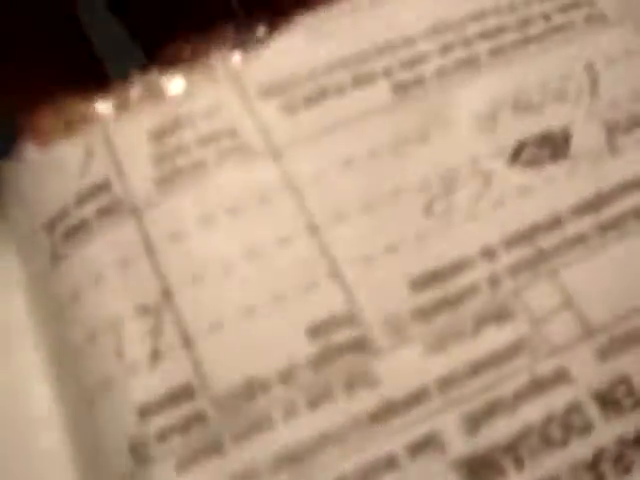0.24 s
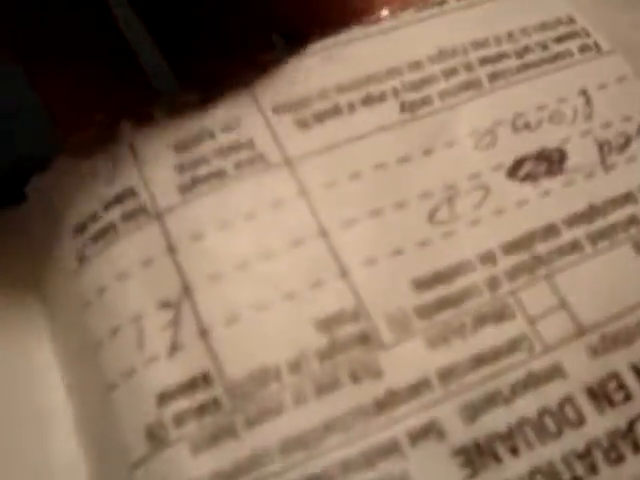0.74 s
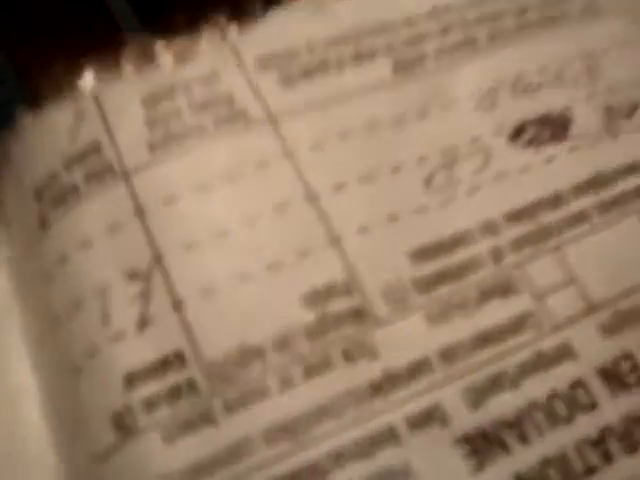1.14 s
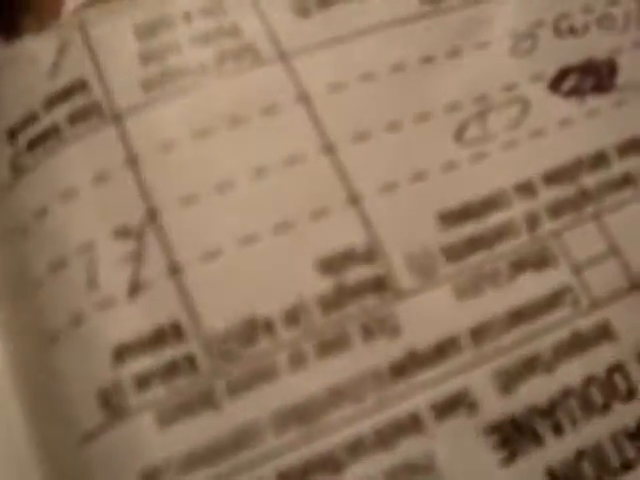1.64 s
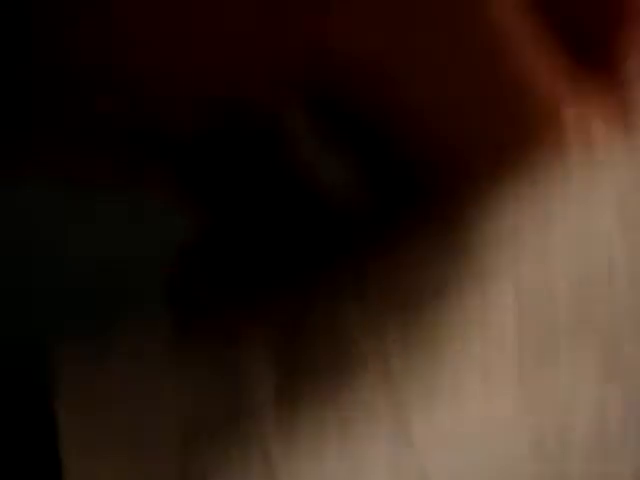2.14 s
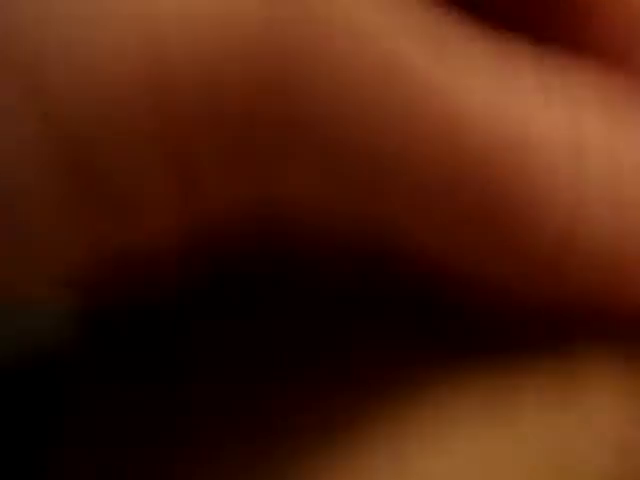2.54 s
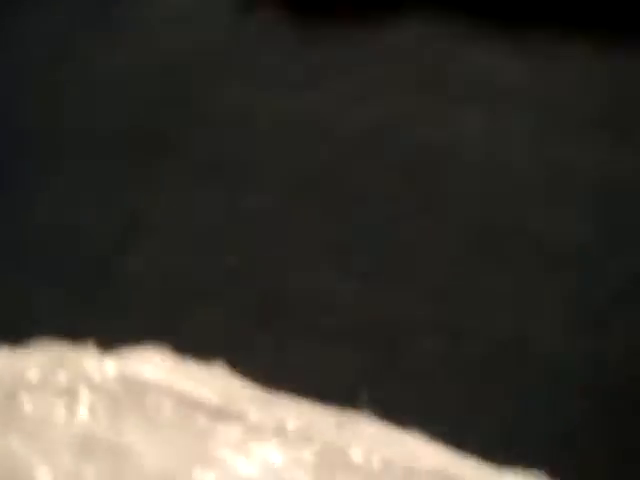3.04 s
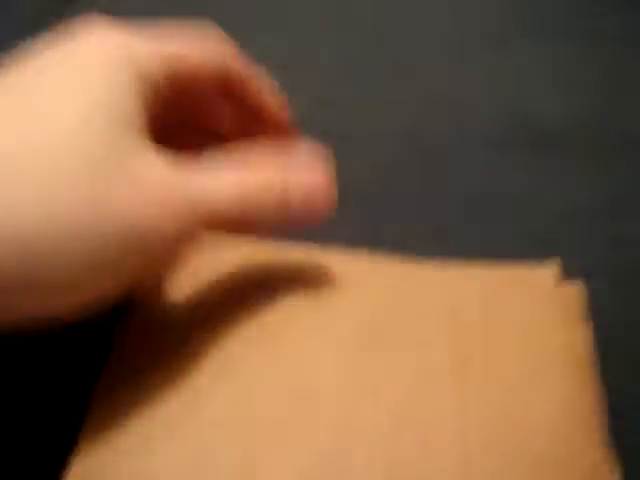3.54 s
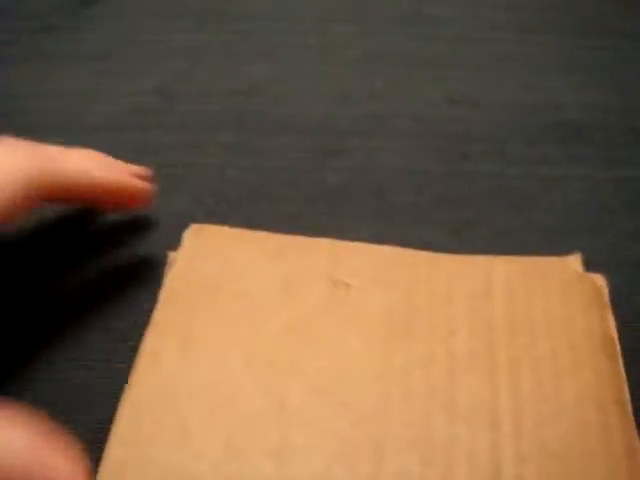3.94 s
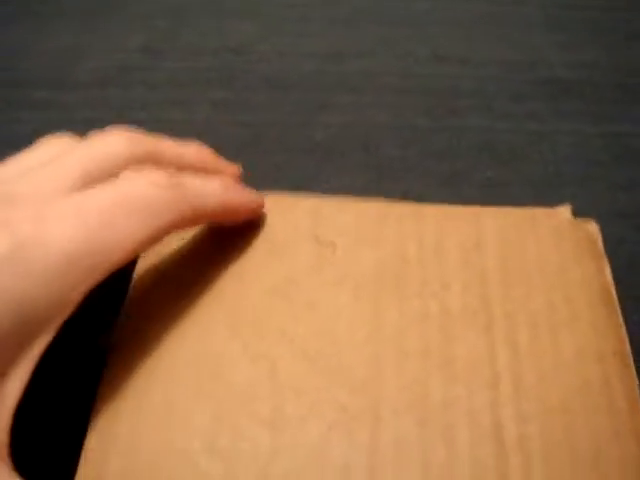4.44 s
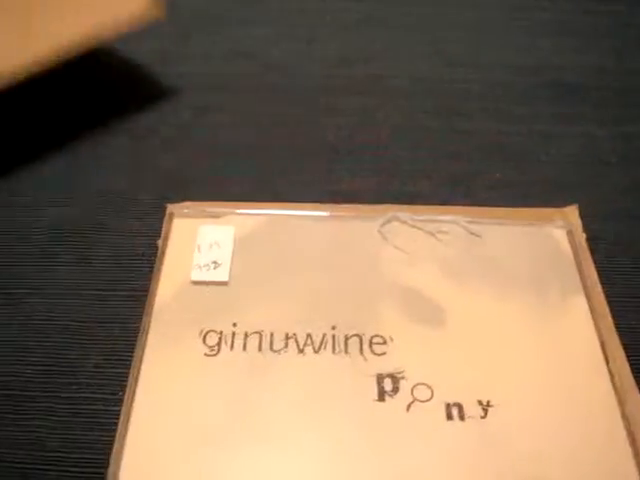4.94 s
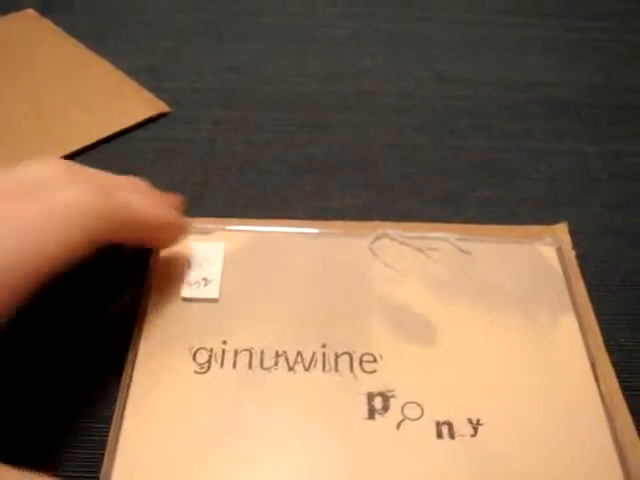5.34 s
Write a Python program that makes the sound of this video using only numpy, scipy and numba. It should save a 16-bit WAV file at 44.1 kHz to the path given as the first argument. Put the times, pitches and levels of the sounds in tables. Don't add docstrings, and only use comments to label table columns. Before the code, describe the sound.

A quiet indoor room with low steady air hum and slight hiss, heard through a small close camera microphone with limited treble. From the start, stiff envelope paper creaks softly and ticks, with scattered pops. Around 0.4 to 0.5 s a loud creak and a tight burst of snaps crack out. Lighter crackles and hollow pops continue, with a firmer pair near 1.0 and 1.24 s. Very loud, clipped snaps hit at 1.45 and 1.49 s, followed by rustle. A softer spell of small crackles leads to hard pulls and sharp cracks from 2.0 to 2.3 s. From 2.4 to 3.0 s dense bright crinkling swells, strongest around 2.8 to 3.0 s, as the card sleeve comes out. Small knocks follow at 3.2 and 3.4 s, and a cluster of snaps at 3.6 s. After that it is nearly silent: faint brushing and a tiny squeak around 4.5 s, a small tick at 4.65 s, barely audible touches near 5.15 and 5.4 s, ending about 5.5 s.

```python
import sys
import numpy as np
from scipy import signal
from scipy.fft import rfft, irfft
from scipy.io import wavfile
from scipy.ndimage import uniform_filter1d, minimum_filter1d
from numba import njit

SR = 44100
rng = np.random.default_rng(int(sys.argv[2]) if len(sys.argv) > 2 else 0)


def to_wav(s):
    ch = np.atleast_2d(s).T
    pcm = np.round(np.clip(ch, -1, 1) * 32767)
    wavfile.write(sys.argv[1], SR, pcm.astype(np.int16))


def boost_factor(decibels):
    exponent = np.asarray(decibels, float) / 20
    return 10 ** exponent


N = 245625

# start in seconds, peak in dB, patch pitch in Hz, fall in ms.
SNAPS = [(0.1553, -20.5, 3200, 2), (.2958, -20.5, 645, 3.1), (0.492, -19, 740, 4.9),
         (.5041, -4.5, 530, 2.37), (0.5078, -8, 450, 5.4), (0.8185, -28, 676, 1.43),
         (0.982, -17, 1130, 7.6), (0.993, -16.5, 1560, 4.1), (1.1602, -21.5, 744, 0.76),
         (1.168, -19.5, 4100, 1.3), (1.2362, -8, 970, 1.3), (1.382, -19, 3860, 1.6), (1.4519, 2, 1560, 1.3),
         (1.4904, 4.5, 1560, .8), (1.722, -32, 3920, 1.5), (1.7976, -32, 820, 5.3),
         (2.0052, -11.5, 1450, 1.7), (2.0297, 1.5, 1870, 2.8), (2.0836, -18, 1510, 3.8),
         (2.2192, -22, 885, 4.7), (2.3116, -5, 2200, 0.88), (3.1873, -19.5, 2860, 1.06),
         (3.2089, -23.5, 268, 3.2), (3.366, -36, 850, 5.1), (4.646, -30.5, 1100, 2.6),
         (3.5867, -10, 1186, 6.1), (3.5903, -8, 2840, 2.2), (3.5925, -6.5, 1164, 3.76),
         (3.61, -18, 1180, 2.8), (4.645, -32, 3140, 4.2)]
# start in seconds, peak in dB, patch pitch in Hz, fall in ms.
CRACKS = [(.1956, -24.5, 2830, 0.43), (.2260, -35, 670, 2), (.2448, -27.5, 1090, 0.78),
          (.3754, -40, 1630, 2.7), (.5071, -6.5, 2650, 5.5), (.5135, -12, 3920, 3.3),
          (1.272, -31, 5000, 1.1), (1.4125, -35, 1820, 7.1), (1.4985, -21, 740, 3.2),
          (1.7395, -30, 790, 1.64), (1.7679, -33, 670, 2.6), (1.8105, -27.5, 3040, 1.3),
          (1.836, -31.5, 1570, 0.64), (1.8755, -25, 970, 1.56), (1.9007, -26, 830, 4.8),
          (1.9845, -22, 260, 1.66), (1.9908, -26, 885, 3.3), (2.049, -15.5, 970, 5.3),
          (2.1645, -8, 2150, 3.65), (2.2645, -24, 650, 0.57), (2.554, -30, 800, 3.8),
          (3.1228, -33, 1405, 1.34), (3.5228, -29, 3570, 3.7), (5.1469, -48, 320, 3.7),
          (5.162, -48, 1244, 10.5)]
# start in seconds, peak in dB, patch pitch in Hz, fall in ms.
POPS = [(.138, -16, 755, 2.7), (0.2935, -16.5, 1424, 3.4), (0.562, -24, 676, 8.5), (.6946, -20.5, 690, 3.7),
        (0.752, -39, 1250, 1.1), (0.7803, -27.5, 2400, 1.3), (0.8826, -20, 410, 2.1),
        (0.932, -20.5, 690, 4.9), (.9855, -9, 1923, 6.2), (0.988, -12, 590, 3.9), (1.0576, -27, 710, 6.6),
        (1.0887, -22.5, 655, 5.6), (1.115, -11, 1125, 1.1), (1.2356, -8.5, 1640, 2.3),
        (1.3458, -21.5, 4170, 2.3), (1.5445, -11.5, 397, 1.7), (1.652, -22, 1020, 2),
        (2.2821, -13.5, 2710, 1.5), (2.2803, -1.5, 1930, .9), (2.7396, -22, 880, 1.1),
        (2.8616, -16, 1040, 5.4), (2.9865, -12, 2340, 0.88), (3.473, -21, 1530, 4.9),
        (3.548, -24.5, 1470, 4.3), (3.5723, -17, 1220, 1.7), (0.413, -12, 1130, 4.3),
        (0.4134, -15, 1950, 4.5), (3.3858, -9.5, 940, 1.3), (3.387, -18, 410, 1.8)]
# start in seconds, peak in dB, pitch in Hz, fall in ms.
CREAKS = [
    (.084, -19, 780, 7),
    (.104, -23.5, 710, 6.7),
    (0.409, -5, 670, 4.2),
    (0.5108, -4, 730, 4.2),
    (4.506, -42.5, 2680, 34),
]
# start in seconds, peak in dB, pitch in Hz, fall in ms.
THUMPS = [(.508, -18.5, 300, 8.4), (1.371, -30.5, 240, 8.7), (2.034, -26, 136, 2.7), (2, -29.5, 67, 4.2),
          (2.311, -22.5, 32, 7), (2.968, -17, 306, 11.8), (3.213, -41, 81, 25), (3.62, -37.5, 90, 32),
          (3.245, -30, 150, 15), (3.369, -36, 130, 19.2), (0.86, -34, 63, 6), (.52, -22, 62, 11)]
# start in seconds, peak in dB, pitch in Hz.
TICKS = [(.0092, -23, 5540), (0.0296, -26.5, 6970), (.036, -26, 3350), (0.1185, -25, 1410),
         (0.1765, -37, 3820), (0.3699, -23.5, 7430), (0.4438, -23.5, 7160), (.455, -32, 6400),
         (.645, -26.5, 7730), (.68, -28.5, 6200), (0.7374, -29.5, 2500), (0.8936, -25.5, 5600),
         (.9034, -31, 3120), (1.247, -19, 5500), (1.1282, -19.5, 1770), (1.1805, -18, 6880),
         (1.2271, -22, 6070), (1.31, -25, 6500), (1.3192, -28.5, 6450), (1.353, -21, 6700),
         (1.8826, -31, 1350), (1.9222, -19, 3370), (1.9371, -20, 2800), (1.9639, -35, 1420),
         (2.394, -16.5, 3030), (2.404, -23.5, 3120), (2.5213, -32, 2240), (2.9666, -17, 1990),
         (3.165, -28, 6000), (3.27, -29, 7700)]
TICK_FALL_MS = 1
# spray against ring in dB, least rise in ms, rise as share of fall,
# neighbour modes in dB.
BUCKLE_KINDS = [
    (2.5, .7, .22, -0.3),
    (-5.5, .55, 0.13, 3.5),
    (-15, .55, 0.13, 0.4),
    (-23, 0.36, 0.88, -5),
    (-47, 4.2, 0.18, -1),
    (-2.5, 0.83, 0.075, 5.5),
]

# time in seconds, effort in dB, small creases against body in dB.
GRIP = [(0, -54, 17.5), (.2, -52.5, 8.5), (.26, -51, -2.5), (.55, -44, 1), (.7, -47, -8), (.81, -52, 0.5),
        (1.1, -45.5, -5.5), (1.8, -52, -1.5), (2.0, -55, -3), (2.4, -39, 9), (2.55, -45, 4), (3.1, -51, 11),
        (3.3, -53, -10.5), (3.5, -48.5, -6), (3.72, -58.5, -4.5), (4.3, -57, 1.5), (4.75, -55, -5.5),
        (5.56, -60, -1)]
# full effort at seconds, hold in seconds, effort in dB,
# small creases against body in dB.
STROKES = [(0.076, 0.056, -36, -17), (0.443, 0.081, -46.5, 6.5), (0.584, .02, -52.5, 12),
           (1.029, 0.007, -42.5, -2), (1.19, .01, -45, 2), (1.355, 0.014, -53, 7), (1.42, .03, -45.5, 3),
           (1.488, 0.012, -29.5, -4.5), (1.553, .13, -39, -2), (2.015, 0.016, -31.5, 3.7),
           (2.133, 0.14, -36.5, 7.7), (2.251, 0.051, -29.5, 0.5), (0.724, 0.014, -54, -6),
           (0.875, 0.023, -44.5, -11), (1.228, 0.0079, -48, -3.2), (1.622, 0.033, -59, -2)]
# full effort at seconds, hold in seconds, effort in dB,
# small creases against body in dB.
SLIDES = [(2.918, 0.039, -43.5, 17), (3.123, .04, -46, 2.5), (3.384, .01, -44, 4.5), (3.538, .01, -51, 3),
          (2.402, 0.025, -33.5, -2), (2.561, 0.011, -41.5, 8), (2.67, 0.033, -32, 6.5),
          (2.735, 0.062, -33, 8.5), (2.816, 0.044, -27, 1.5), (2.968, 0.0049, -17.5, -5.5),
          (3.417, 0.035, -51.5, 11), (3.48, .02, -41, -5), (3.6, 0.022, -42, 1.5), (4.448, .004, -52, 4.5),
          (4.522, 0.15, -56, 1.5), (5.156, 0.0036, -60.5, 17), (5.433, 0.045, -60.5, 8)]
# full effort at seconds, hold in seconds, effort in dB,
# small creases against body in dB.
JERKS = [
    (1.677, 0.023, -47, 8.5),
    (1.909, 0.038, -36.5, 4.5),
    (2.081, 0.014, -31.5, 2.5),
    (2.994, 0.039, -34, 10.5),
    (3.194, 0.026, -40.5, 2),
]
ATTACK_DB_PER_S, RELEASE_DB_PER_S, STOP_DB_PER_S = 288.5, 234, 1200
CREASE_HASTE = 1.28
PANEL_DB, PANEL_FOLLOW, PANEL_DULL = -52.5, 0.46, 0.067
CARD_OUT_S, ENVELOPE_SCATTER_DB, CARD_SCATTER_DB = 2.4, 2, -0.48
SMOOTH_PER_DB = .09

# centre in Hz, width in Hz.
BANDS = [
    (350, 650),
    (1650, 2100),
    (6000, 6500),
]
# frequency in Hz, level in dB per Hz.
PAPER = [(71, -55), (120, -37.5), (387, -12), (492, -12.5), (843, -3), (2020, -4.5), (2520, -2), (6500, 1),
         (8590, 0.5), (10200, -3), (13200, -50), (22000, -120)]
# frequency in Hz, level in dB per Hz.
ROOM = [(15, -49), (25, -22.5), (173, -11), (246, -4), (387, -3), (417, -44), (473, 0.5), (550, -12.5),
        (843, -13), (980, -14.5), (1700, -13.5), (2960, -21.5), (10200, -15), (13200, -70), (22000, -120)]
ROOM_DB = -51.5
TOP_HZ = 10050


@njit
def grains(start, hz, rise_s, t60_s, size, turn):
    out = np.zeros(N)
    for k in range(len(start)):
        spin = np.exp(2j * np.pi * hz[k] / SR)
        fade = np.exp(-np.log(1000) / (t60_s[k] * SR))
        z = size[k] * np.exp(1j * turn[k])
        up = 1 + int(rise_s[k] * SR)
        for i in range(min(N - start[k], up + int(.5 * t60_s[k] * SR))):
            out[start[k] + i] += z.imag * min(1., (i + 1) / up)
            z *= spin if i < up else spin * fade
    return out


def shape_db(table, hz):
    table_hz, db = np.transpose(table)
    return np.interp(np.log(hz), np.log(table_hz), db)


def sample(s):
    return np.clip(s * SR, 0, N - 1).astype(np.int64)


def walk(rate_hz):
    held = rng.standard_normal(N // 100)[(np.arange(N) * rate_hz / SR).astype(int)]
    return uniform_filter1d(held, int(SR / rate_hz))


def buckles():
    ticks = [tick + (TICK_FALL_MS,) for tick in TICKS]
    rows = []
    for table, kind in zip((CRACKS, SNAPS, POPS, CREAKS, THUMPS, ticks), BUCKLE_KINDS):
        spray_db, least_rise_ms, rise_share, modes_db = kind
        for row in table:
            rows.append(row + (spray_db, least_rise_ms + rise_share * row[-1], modes_db))
    return np.transpose(rows)


def snaps(count=40, lo_hz=350, hi_hz=10000, crack_cycles=4.4, spray_db=-3.0, tilt=0.49,
          order=6, ring=5.0, ring_db=-6.5, near_db=-10.5, near_octaves=.8):
    s, db, patch_hz, fall_ms, crack_db, rise_ms, modes_db = buckles()[:, :, None]
    fall_s, rise_s = fall_ms / 1000, rise_ms / 1000
    late, early, pitch, turn, big = np.moveaxis(rng.random((len(s), count, 5)), 2, 0)
    hz = lo_hz * (hi_hz / lo_hz) ** pitch
    delay_s = rise_s * np.sqrt(early) - 0.66 * fall_s * np.log(late) * (1500 / hz) ** .3
    piled = count * 0.7 / hz / (0.56 / hz + fall_s + rise_s)
    size = boost_factor(db + crack_db + spray_db + shape_db(PAPER, hz) + 3.4 * big)
    size = size * (hz / 1500) ** tilt / np.sqrt(1 + piled)
    flat_hz = hz.ravel()
    cracks = grains(sample(s + delay_s).ravel(), flat_hz, 0.37 / flat_hz, crack_cycles / flat_hz,
                    size.ravel(), 2 * np.pi * turn.ravel())
    other = np.arange(order) > 0
    mode_hz = patch_hz * 2 ** (other * near_octaves * (2.4 * pitch[:, :order] - 1))
    mode_hz = np.minimum(mode_hz, hi_hz)
    start_s = s + other * .5 * fall_s * late[:, :order]
    strength = boost_factor(db + ring_db + other * (near_db + modes_db + 1.3 * big[:, :order]))
    phase = turn[:, :order] * (1 + 5 * other)
    each = np.ones(order)
    patch = grains(sample(start_s).ravel(), mode_hz.ravel(), (rise_s * each).ravel(),
                   ((ring * fall_s + 0.0015) * each).ravel(), strength.ravel(), phase.ravel())
    return cracks + patch


def effort(t):
    s, grip_db, bright_db = np.transpose(GRIP)
    full_s, hold_s, stroke_db, shine_db = np.transpose(STROKES + SLIDES + JERKS)[:, :, None]
    counts = [len(STROKES + SLIDES), len(JERKS)]
    release = np.repeat([RELEASE_DB_PER_S, STOP_DB_PER_S], counts)[:, None]
    short_db = ATTACK_DB_PER_S * np.maximum(full_s - t, 0)
    short_db = short_db + release * np.maximum(t - full_s - hold_s, 0)

    def total_db(base_db, peaks_db):
        return 10 * np.log10(boost_factor(2 * base_db) + boost_factor(2 * peaks_db).sum(axis=0))

    body_db = total_db(np.interp(t, s, grip_db), stroke_db - short_db)
    creases_db = total_db(np.interp(t, s, grip_db + bright_db),
                          stroke_db + shine_db - CREASE_HASTE * short_db)
    panels_db = PANEL_DB + PANEL_FOLLOW * (body_db + 45) - PANEL_DULL * (creases_db - body_db)
    return panels_db, body_db, creases_db


def rustle(count=30000, lo_hz=160, hi_hz=10350, cycles=17.6, surge_db=1.73, surge_hz=60):
    when, pitch, chance, turn = rng.random((count, 4)).T
    at = sample(when * N / SR)
    hz = lo_hz * (hi_hz / lo_hz) ** pitch ** .7
    levels_db = effort(at / SR)
    density_db = [db - 10 * np.log10(width) for db, (_, width) in zip(levels_db, BANDS)]
    knots = np.log([centre for centre, _ in BANDS])
    share = [np.interp(np.log(hz), knots, row) for row in np.eye(3)]
    detail_db = shape_db(PAPER, hz) - np.interp(np.log(hz), knots, shape_db(PAPER, np.exp(knots)))
    per_hz_db = sum(a * b for a, b in zip(share, density_db)) + detail_db
    scatter_db = np.where(at / SR < CARD_OUT_S, ENVELOPE_SCATTER_DB, CARD_SCATTER_DB)
    scatter_db = np.clip(scatter_db - SMOOTH_PER_DB * (levels_db[1] + 55), 0, 3.6)
    spread = boost_factor(-scatter_db * np.log(chance)) * np.sqrt(1 - scatter_db * np.log(10) / 10)
    crowd = count * SR / N / np.log(hi_hz / lo_hz) * pitch ** .3 / 0.66
    crowd = crowd * cycles / (4 * np.log(1000))
    size = boost_factor(per_hz_db + surge_db * walk(surge_hz)[at]) * hz / np.sqrt(crowd) * spread
    return grains(at, hz, .5 / hz, cycles / hz, size, 2 * np.pi * turn)


def echoes(x, t60_s=0.045, dull_hz=2500, wet_db=-17):
    t = np.arange(5000) / SR
    tail = rng.standard_normal(len(t)) * boost_factor(-60 * t / t60_s) * (t > .002)
    tail = signal.lfilter(*signal.butter(1, dull_hz, fs=SR), tail)
    return x + boost_factor(wet_db) * signal.oaconvolve(x, tail / np.linalg.norm(tail))[:N]


def room():
    hz = np.maximum(np.arange(N // 2 + 1) * SR / N, 20)
    air = irfft(rfft(rng.standard_normal(N)) * boost_factor(shape_db(ROOM, hz)), N)
    return air / air.std() * boost_factor(ROOM_DB + .6 * walk(9))


def scene():
    return (rustle() + echoes(snaps()) + room())[None]


def gate_treble(x, size=512, under_db=-24.5, beside_db=-9.0, from_hz=3200, band_db=5.5,
                spare_db=4.5, reach=7, hold=2):
    hz, t, z = signal.stft(x, SR, nperseg=size, noverlap=size // 2)
    whole = np.sum(np.abs(z[hz > 800]) ** 2, axis=0)
    edges = np.searchsorted(hz, np.geomspace(from_hz, TOP_HZ + 300, num=11))
    for a, b in zip(edges[:-1], edges[1:]):
        power = np.sum(np.abs(z[a:b]) ** 2, axis=0)
        click = -minimum_filter1d(-power, reach)
        need = np.maximum(whole * boost_factor(2 * under_db), click * boost_factor(2 * beside_db))
        luck_db = band_db * np.repeat(rng.standard_normal(len(t)), hold)[:len(t)]
        z[a:b] *= power > need * boost_factor(2 * (luck_db - spare_db * np.log2(TOP_HZ / hz[b])))
    return signal.istft(z, SR, nperseg=size, noverlap=size // 2)[1][:N]


def roll_off(x):
    return signal.sosfilt(signal.butter(12, 16300, fs=SR, output="sos"), x)


def record(dry, bass_hz=125, droop_hz=4800, ceiling=0.77, clip=.71):
    x = signal.sosfilt(signal.butter(2, bass_hz, "high", fs=SR, output="sos"), dry[0])
    x = signal.lfilter(*signal.butter(1, droop_hz, fs=SR), x)
    x = gate_treble(ceiling * np.tanh(x / ceiling))
    x = signal.sosfiltfilt(signal.cheby2(16, 40, TOP_HZ + 250, fs=SR, output="sos"), x)
    mix = np.clip(x, -clip, clip)[None]
    return roll_off(mix)


dry = scene()
out = record(dry)
to_wav(out)
```